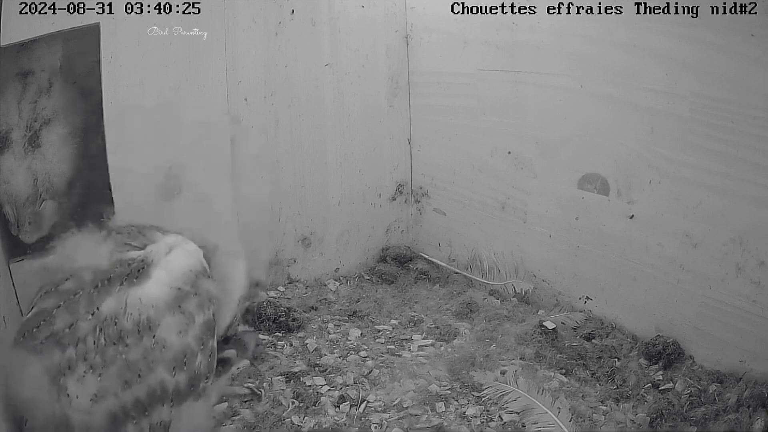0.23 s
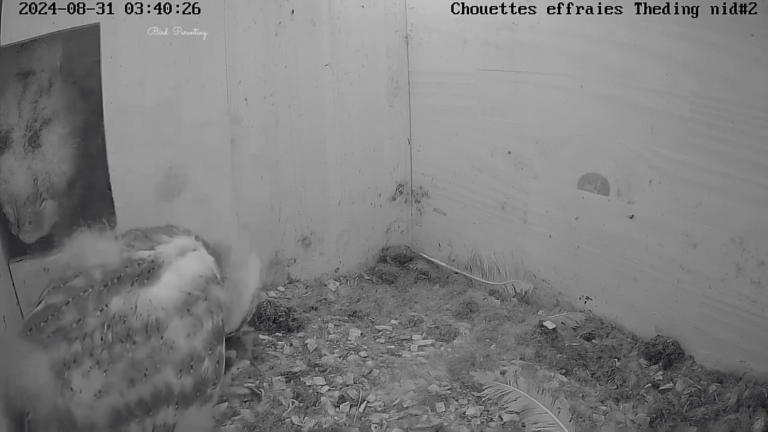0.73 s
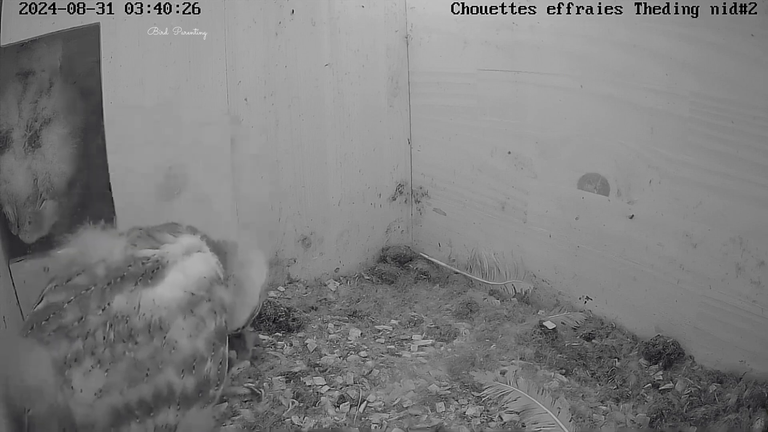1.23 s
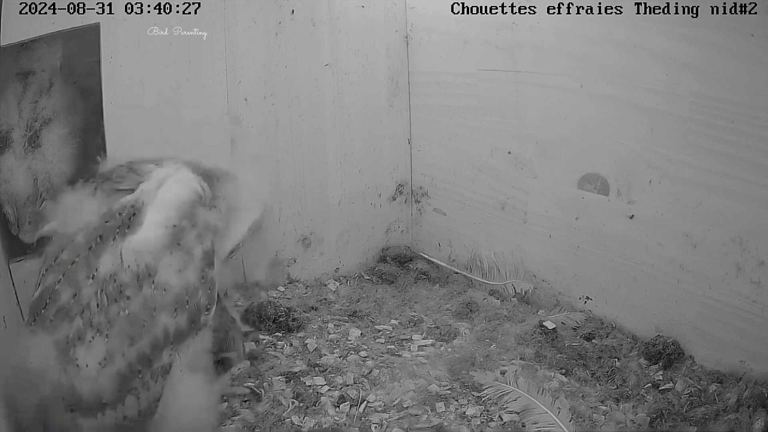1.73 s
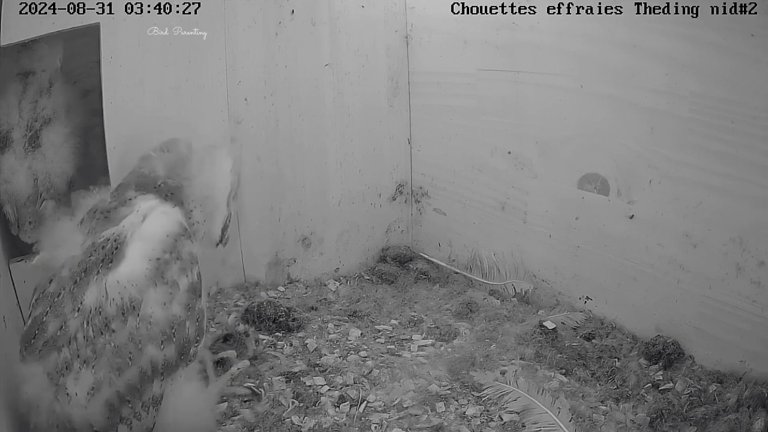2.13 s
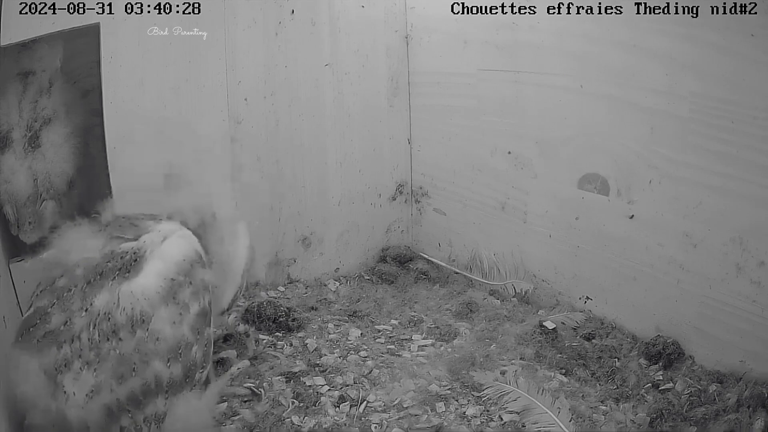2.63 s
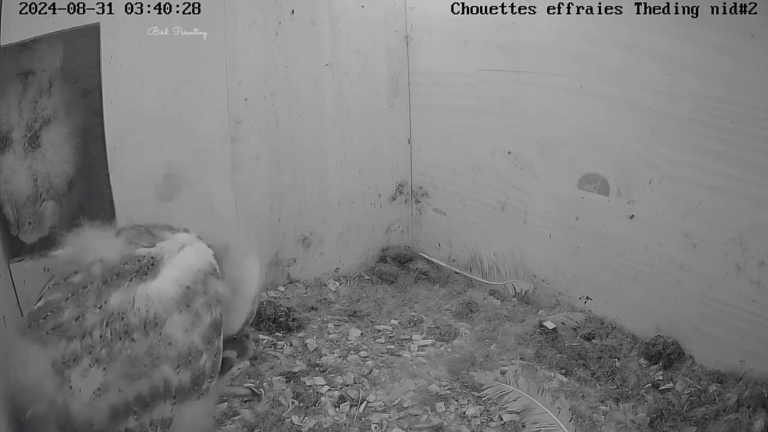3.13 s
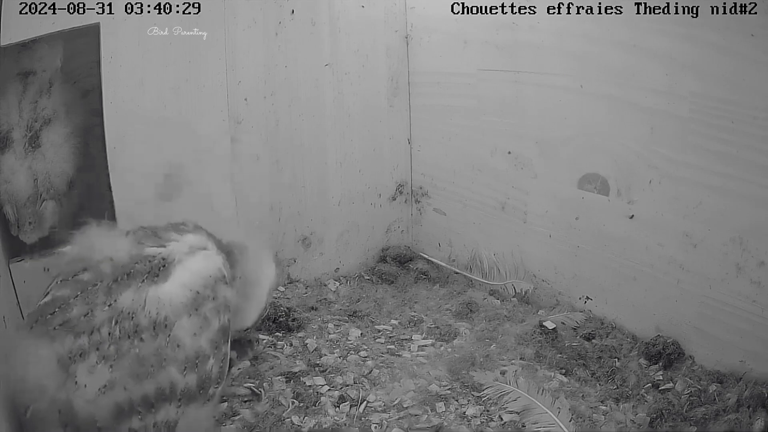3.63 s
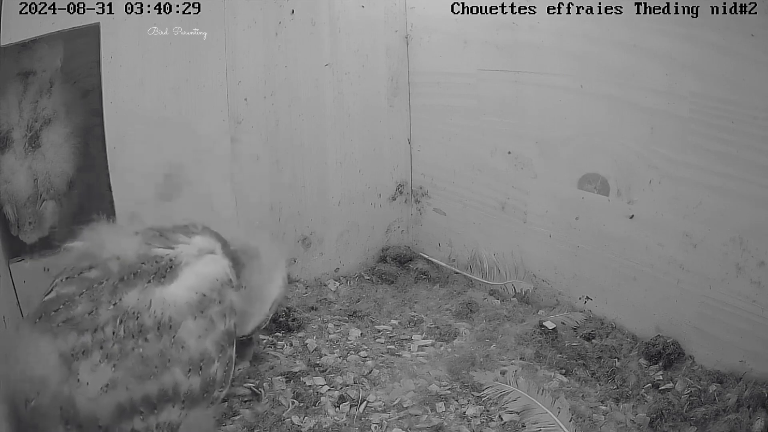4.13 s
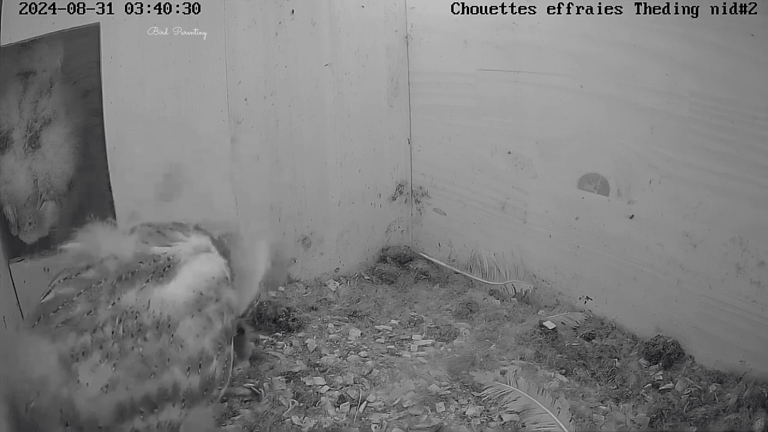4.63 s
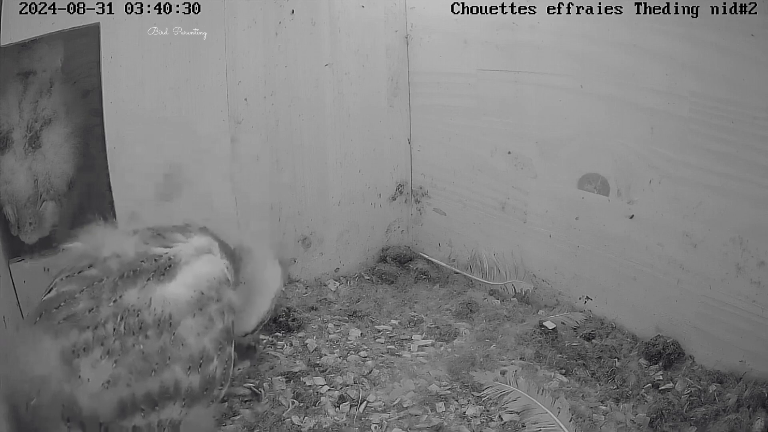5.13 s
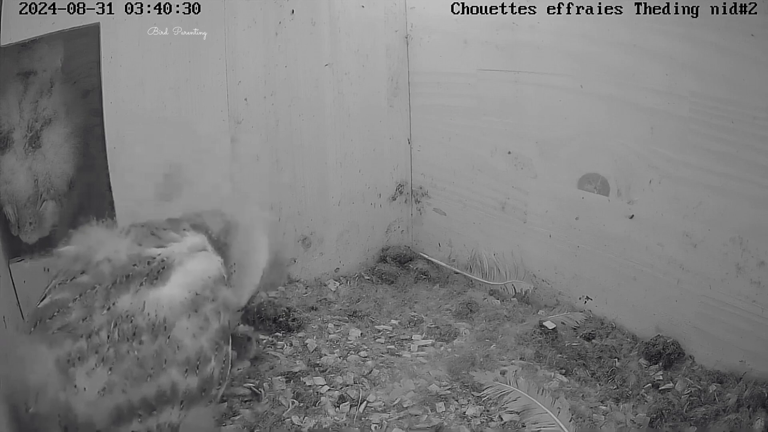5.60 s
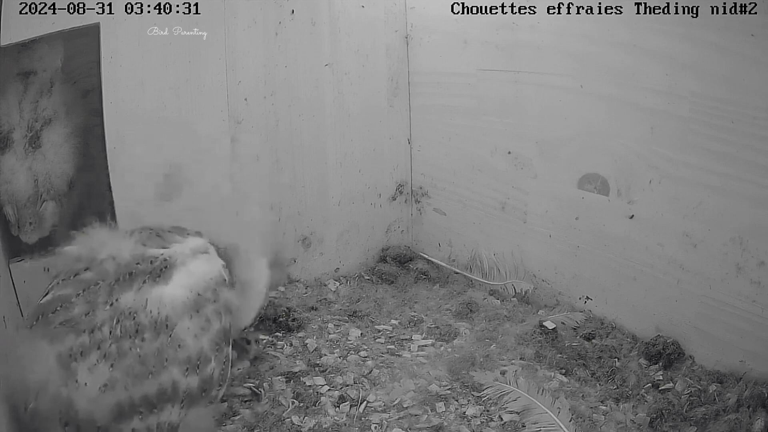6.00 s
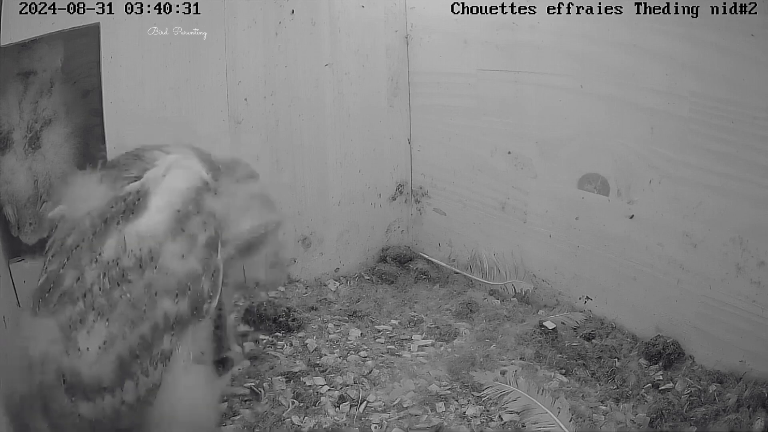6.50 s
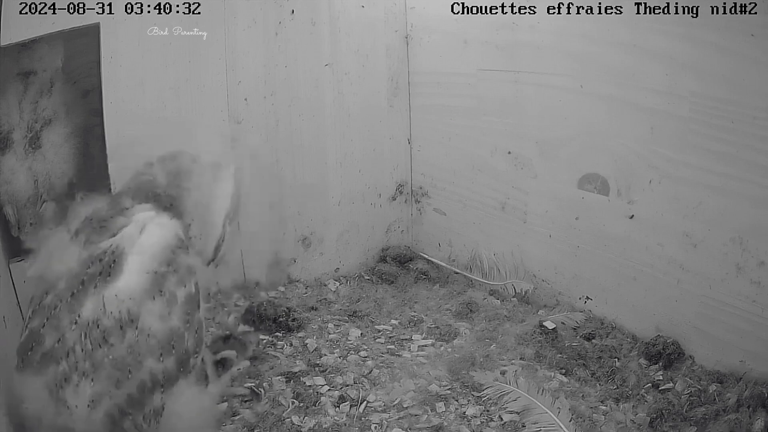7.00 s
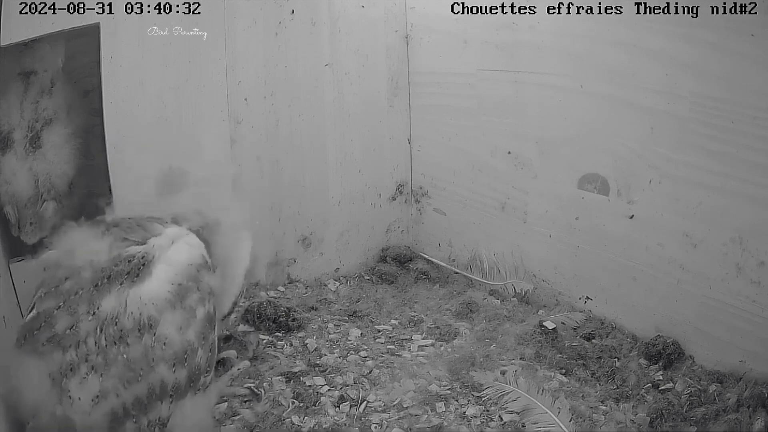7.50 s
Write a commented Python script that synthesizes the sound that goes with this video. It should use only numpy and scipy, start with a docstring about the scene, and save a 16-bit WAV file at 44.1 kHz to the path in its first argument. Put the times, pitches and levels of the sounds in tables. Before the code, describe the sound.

A barn owl chick begs close by inside a wooden nest box, with seven rasping, breathy hisses that each swell and fade over about half a second or a little longer. The first is already ending at the start; the others begin at about 0.6, 1.5, 2.2, 3.4, 4.8 and 6.9 seconds. Several finish with a tiny falling whistle, clearest at 0.2, 1.2 and 4 seconds. The chick's feet make low, dull thumps on the boards at 0.3 and 0.8 seconds, then a stronger cluster from 1.7 to 2.2, each leaving a short rumble. Around 6.4 seconds come more thumps and a brief scratch of claws on wood and dry litter. A soft, steady microphone hiss runs underneath, with small sharp clicks near 2.1, 2.4, 7.1 and 7.5 seconds. The whole sound cuts out for an instant about eleven times a second, giving a slight stutter.

```python
"""In a wooden nest box, a barn owl chick begs with seven long, rasping hisses.
Each is rushing air ringing in its throat, its bill and the box; some end on a brief whistle.
As it shifts about, its feet thump the floor and its claws scratch the litter.
The nest camera adds a steady hiss and a few clicks, and its sound cuts out for an instant
about eleven times a second."""
import sys
import numpy as np
from scipy import signal
from scipy.fft import rfft, irfft
from scipy.io import wavfile

SR = 44100
rng = np.random.default_rng(int(sys.argv[2]) if len(sys.argv) > 2 else 0)


def master_out(mix):
    """Clip the mix to full scale and print it as 16-bit PCM to the path in sys.argv[1]."""
    frames = np.transpose(np.atleast_2d(mix))
    ceiling = np.clip(frames, -1, 1)
    pcm = np.round(ceiling * 32767).astype(np.int16)
    wavfile.write(sys.argv[1], SR, pcm)


N = 341775
TIME = np.arange(N) / SR
HZ = np.fft.rfftfreq(N, 1 / SR)


def begging(turn_at_s=5.21, turn_length_s=0.033):
    """Seven hisses, each coloured by how the chick holds its head; it turns during the sixth."""
    # The hisses: (start [s], length [s], swell time [s], later growth [dB/s], fade time [s],
    # fade curve [1 = even, more = late and steep], level [dB], low band against that level [dB],
    # high band against that level [dB], opening puff [dB])
    hisses = [(-.3, 0.51, .28, 0, 0.24, 3.6, -32, -7.5, -10, 0),
              (0.63, 0.58, 0.21, 5.5, 0.21, 3, -38, -4, -0.9, -4),
              (1.493, .512, 0.48, 10, 0.17, 1.7, -42.5, -5, -3.5, 5),
              (2.243, .716, 0.48, 4.5, 0.13, 2.4, -39.5, -7.5, -8.5, 7),
              (3.433, 0.5915, 0.27, 14.5, 0.16, 2.74, -35.5, -11.5, -5, 14),
              (4.767, 0.767, .45, -1.5, .085, 2.6, -42, -1, -6, 5),
              (6.891, 0.65, .34, 13, .075, 0.99, -35, -12.5, -4.5, 15.5)]
    # Where throat, bill and box ring together, for each head pose: (pitch [Hz], width [Hz], level [dB])
    pose_1 = [(378, 140, -14.5), (574, 140, -11.5), (846, 150, -15.5), (990, 79, -6), (1063, 72, 0.5),
              (1286, 160, -3.5), (1670, 370, -12), (2040, 140, -5), (2244, 90, -0.5), (2260, 98, -2),
              (2454, 350, -4), (2710, 130, -2), (2970, 210, 0.5), (3330, 310, -3), (3430, 100, -3),
              (3830, 120, 0), (3880, 140, -9), (4130, 160, 2.5), (4200, 390, -8), (4570, 220, -4),
              (4845, 120, -15), (5070, 240, -11.9), (5390, 260, -11), (6020, 550, -13.5), (6500, 470, -18),
              (6829, 110, -9.5), (7140, 260, -15), (7300, 140, -25)]
    pose_2 = [(395, 99, -3.5), (592, 76, -5.5), (755, 76, -9), (934, 110, -7), (1080, 126, 0.7),
              (1330, 170, -2.5), (1590, 120, -10), (1686, 280, -11), (1928, 110, -12), (2000, 67, -5.5),
              (2170, 190, -10), (2350, 90, -5), (2486, 71, 2), (2670, 190, -6), (2880, 120, -2),
              (2990, 110, -5), (3144, 140, -5), (3650, 430, -4.5), (4170, 340, -3.5), (4470, 130, -2.5),
              (4920, 78, -2), (4850, 110, -9), (5070, 130, -7), (5360, 620, -9), (5800, 260, -9.9),
              (6411, 410, -5), (6630, 320, -4), (6960, 230, -3.5)]
    pose_3 = [(386, 49, 2), (470, 100, -5), (595, 110, -8), (910, 180, -4.5), (1087, 150, -2),
              (1374, 105, -5), (1730, 170, -15), (2100, 310, -4.5), (2340, 250, -7), (2484, 96, -0.5),
              (2840, 160, -4.5), (3150, 250, -6.5), (3310, 110, -4.5), (3480, 240, -7), (3770, 160, -7),
              (3980, 110, -14), (4130, 160, -7), (4460, 230, -6), (4540, 100, -15), (4850, 130, -11),
              (5140, 390, -16), (5300, 90, -8), (5500, 130, -9), (5800, 350, -9), (6070, 630, -11),
              (6670, 450, -15), (6840, 140, -16), (7170, 300, -7.5)]
    pose_4 = [(390, 58, -7), (469, 100, -9.5), (587, 88, -5.5), (894, 120, -11), (1080, 100, -11.5),
              (1210, 99, -8), (1322, 66, -1), (1408, 166, -6), (1690, 160, -20.6), (1970, 140, -22),
              (2080, 190, -16), (2320, 190, -4.5), (2500, 100, -5.5), (2673, 89, -1), (2820, 210, -4),
              (2990, 99, -3), (3200, 240, -2), (3580, 220, -2), (3900, 120, 1.8), (4100, 99, -8),
              (4400, 140, -12), (4640, 60, -2), (5100, 810, -13), (5750, 1400, -13.5), (6540, 93, -10.5),
              (6950, 400, -21), (7250, 300, -20), (7330, 120, -11)]
    pose_5 = [(380, 53, -7.5), (440, 91, -10.3), (589, 71, -11.5), (750, 82, -17.5), (870, 96, -17),
              (1059, 77, -8), (1140, 110, -18), (1290, 150, -12), (1420, 180, -18), (2146, 140, -8.5),
              (2445, 89, -4), (2480, 670, -10.8), (2730, 90, -8), (2800, 100, -8), (2990, 160, -2),
              (3210, 210, -4), (3430, 220, -8), (3690, 130, -8), (4090, 116, 2.5), (4380, 350, -6),
              (4770, 120, -8.5), (5120, 320, -8), (5760, 230, -7), (6190, 87, -7.5), (6460, 150, -18),
              (6640, 160, -8), (7000, 450, -9.5), (7420, 170, -16)]
    pose_6 = [(393, 58, -0.7), (482, 100, -3.5), (599, 60, -5), (923, 160, -7.5), (1056, 75, -1.8),
              (1140, 91, -8), (1310, 250, -8.5), (1360, 107, 0.5), (1680, 230, -12.5), (1905, 130, -9),
              (2060, 120, -6), (2240, 290, -7.5), (2450, 500, -6.5), (2660, 130, -2), (2970, 220, -6.5),
              (3240, 280, -4), (3670, 240, -6), (3880, 180, -5), (4120, 190, -9), (4520, 280, -10),
              (4861, 330, -18), (5408, 720, -16), (5876, 520, -18), (6188, 110, -9), (6230, 200, -17),
              (6560, 95, -8), (6697, 140, -20), (7000, 690, -14)]
    pose_6_turned = [(401, 68, -7), (564, 140, -7), (890, 140, -13), (1200, 200, -14), (1320, 80, -3),
                     (1360, 110, -9), (1430, 150, -12.6), (1710, 130, -25), (2059, 450, -21),
                     (2288, 170, -7), (2480, 150, -9), (2670, 89, -2.9), (2910, 150, -0.5), (3190, 340, -2),
                     (3560, 210, -1.5), (3700, 77, -5), (3900, 190, -3), (4430, 240, -11.2),
                     (4720, 130, -7.5), (5100, 710, -8.5), (5361, 250, -9), (5698, 100, -10),
                     (5880, 220, -6.5), (6188, 160, -15), (6400, 130, -5.5), (6663, 160, -20),
                     (7000, 160, -12.5), (7240, 440, -16)]
    pose_7 = [(407, 105, -4), (577, 113, -9), (750, 58, -11.5), (872, 55, -7), (1166, 290, -11.5),
              (1503, 130, -12.5), (2050, 60, -4.5), (2167, 93, -4.5), (2530, 520, -4.5), (2830, 180, -2),
              (2980, 100, 1), (3110, 85, 4.5), (3200, 91, -1), (3440, 210, -2), (3880, 300, -5.5),
              (4110, 104, 4.5), (4300, 160, -7), (4520, 370, -9.5), (4800, 240, -9), (5180, 390, -8.5),
              (5750, 130, -11), (5760, 140, -9), (6180, 120, -12.0), (6380, 180, -12.5), (6700, 170, -7),
              (7030, 130, -12), (7110, 140, -8.5), (7340, 150, -13)]
    poses = [pose_1, pose_2, pose_3, pose_4, pose_5, pose_6, pose_7]
    calls = [hiss(row, pose) for row, pose in zip(hisses, poses)]
    turned_call = hiss(hisses[5], pose_6_turned, low_change_db=-7)
    turn = np.clip((TIME - turn_at_s) / turn_length_s + .5, 0, 1)
    calls[5] = np.sqrt(1 - turn) * calls[5] + np.sqrt(turn) * turned_call
    return rasp() * sum(calls)


def hiss(row, pose, low_change_db=0, low_hz=1880, high_hz=4700, open_s=0.0076, close_s=0.019):
    """Rushing air swells and fades with the chick's effort; its low, throaty band changes least."""
    start, length, swell_s, growth, fade_s, curve, level_db, low_db, high_db, puff_db = row
    sounding = (TIME >= start) & (TIME <= start + length)
    t = TIME[sounding] - start
    time_left = length - t
    swell_db = -20 * np.clip(1 - t / swell_s, 0, 1) ** 3.07
    swell_db -= growth * np.maximum(time_left - fade_s, 0)
    fade_db = -29.5 * np.clip(1 - time_left / fade_s, 0, 1) ** curve
    # The low band puffs at the start and bulges just before the air stops.
    opening_db = puff_db * np.exp(-t / .018)
    closing_db = 1.5 * np.exp(-((time_left - 0.029) / 0.019) ** 2)
    throaty_db = low_db + low_change_db + 0.31 * swell_db + .13 * fade_db + opening_db + closing_db
    flow = np.clip(t / open_s, 0, 1) * np.clip(time_left / close_s, 0, 1)
    air = rfft(rng.standard_normal(N)) * resonances(pose) * wall_echoes()
    bands = HZ < low_hz, (HZ >= low_hz) & (HZ < high_hz), HZ >= high_hz
    low, middle, high = (unit(irfft(air * band, N)[sounding]) for band in bands)
    upper = amp(swell_db + fade_db) * (middle + amp(high_db) * high)
    out = np.zeros(N)
    out[sounding] = amp(level_db) * flow * (amp(throaty_db) * low + upper)
    return out


def rasp(depth_db=0.98, fastest_hz=170):
    """The air stream flutters unevenly, which shakes the loudness."""
    flutter = noise(1 / (1 + (HZ / fastest_hz) ** 4))
    return unit(amp(-depth_db * flutter))


def wall_echoes(echo_db=-9.0, ring_s=0.12):
    """Quick echoes between the wooden walls boost some frequencies and weaken others."""
    t = np.arange(SR // 8) / SR
    echoes = rng.standard_normal(len(t)) * amp(-60 * t / ring_s)
    return abs(1 + amp(echo_db) * rfft(echoes / np.linalg.norm(echoes), N))


def falling_notes(octave_db=-19, waver=0.033):
    """Brief falling notes: the chick's whistles, and one short low ring of the box at 3.56 s."""
    # The notes, mostly as a hiss ends:
    # (start [s], length [s], first pitch [Hz], last pitch [Hz], level [dB])
    notes = [(0.142, 0.043, 1384, 1240, -43), (0.158, 0.058, 1080, 975, -33.5),
             (1.15, .036, 1406, 1190, -44), (1.17, 0.051, 1114, 1050, -38), (1.949, 0.059, 461, 308, -42),
             (1.971, 0.048, 1250, 1080, -50), (3.564, 0.022, 380, 353, -37),
             (3.996, 0.021, 1110, 1020, -38.5), (7.518, 0.023, 1130, 1010, -48)]
    out, wobble = np.zeros(N), noise(HZ < 120)
    for start, length, first_hz, last_hz, db in notes:
        progress = np.linspace(0, 1, int(length * SR))
        hz = first_hz + (last_hz - first_hz) * progress
        hz *= 1 + waver * wobble[int(start * SR):][:len(hz)]
        phase = 2 * np.pi * np.cumsum(hz) / SR
        swell = np.sin(np.pi * progress ** 0.82) ** 2
        add(out, start, amp(db) * swell * (np.sin(phase) + amp(octave_db) * np.sin(2 * phase)))
    return out


def footsteps(rumble_db=-20, rumble_s=1.0, knock_s=0.23):
    """Each step knocks the boards and swells the floor's low note; the box rumbles on after it."""
    # Feet landing: (time [s], note level [dB], note pitch [Hz], rise time [s], knock level [dB])
    steps = [(0.269, -32, 73, 0.033, -46), (0.386, -44.5, 76, 0.019, -54.5), (.46, -46.5, 75, 0.017, -69),
             (0.75, -33, 74, 0.02, -57), (1.645, -40, 65, 0.015, -56), (1.691, -34, 77, 0.0069, -58),
             (1.985, -28, 75, 0.029, -40), (2.065, -28, 73.3, 0.023, -47.5), (2.163, -41.5, 69, 0.012, -61),
             (2.231, -38.5, 72, 0.014, -54), (4.62, -54.5, 65, 0.028, -75), (6.365, -48, 69, 0.019, -63),
             (6.423, -35, 81.4, 0.013, -49), (6.455, -32.5, 86, 0.018, -50.5),
             (6.506, -38, 75.5, 0.033, -59), (6.657, -49, 64.5, 0.038, -64)]
    # Where the box rumbles and where its boards ring: (pitch [Hz], width [Hz], level [dB])
    box_tones = [(35, 30, -8), (60, 30, 1), (86, 51, 4.5), (135, 140, -16)]
    board_tones = [(172, 39, 5.5), (276, 90, -8), (373, 56, -0.5), (750, 550, -18)]
    t = np.arange(SR) / SR
    note, rumble_power, knock_power = np.zeros((3, N))
    for start, db, hz, rise_s, knock_db in steps:
        push = (t / rise_s * np.exp(1 - t / rise_s)) ** 3
        add(note, start, amp(db) * push * np.sin(2 * np.pi * hz * t))
        shake = amp(db - 60 * t / rumble_s) * (1 - np.exp(-t / rise_s))
        add(rumble_power, start, shake ** 2)
        add(knock_power, start, amp(knock_db - 60 * t / knock_s) ** 2)
    rumble = amp(rumble_db) * np.sqrt(rumble_power) * noise(resonances(box_tones))
    knocks = np.sqrt(knock_power) * noise(resonances(board_tones))
    return note + rumble + knocks


def claw_scrapes():
    """A claw rubs briefly over dull wood and bright, dry litter."""
    # The rubs: (start [s], length [s], level [dB], brightness [0-1])
    scrapes = [(0.264, 0.011, -64, 0.4), (5.791, 0.01, -57.5, 0), (6.312, 0.013, -54, 0.65),
               (6.385, 0.031, -56, 0.8), (6.411, 0.018, -38.5, 0.27), (6.425, 0.028, -53, 0.63),
               (6.453, 0.015, -46.5, 0.26), (6.466, 0.0091, -56, 0.3)]
    # Where scratched wood and litter ring: (pitch [Hz], width [Hz], level [dB])
    wood_tones = [(390, 290, -11), (744, 55, 8.5), (1034, 190, -1.5), (1450, 260, -8), (1670, 280, -9),
                  (2200, 400, -22)]
    litter_tones = [(2800, 1800, -2), (4060, 300, -2), (5100, 840, -0.5), (6730, 1100, 0)]
    wood, litter = noise(resonances(wood_tones)), noise(resonances(litter_tones))
    out = np.zeros(N)
    for start, length, db, brightness in scrapes:
        blend = np.sqrt(1 - brightness ** 2) * wood + brightness * litter
        rub = blend[int(start * SR):][:int(length * SR)]
        add(out, start, amp(db) * unit(rub) * signal.windows.tukey(len(rub), .4))
    return out


def cut_outs(beat_s=.086276, late_s=.04641, early_s=.025864, gap_s=.0079, gap_db=-22, edge_s=.000025):
    """The camera's volume drops for an instant, over and over, on a limping beat."""
    beat = np.arange(1, N / SR / beat_s)
    stalls = beat // 4  # every fourth beat comes late
    slips = np.floor(.432 + .25 * beat + .218 * stalls)  # about every third comes early
    times = -.04656 + beat_s * beat + late_s * stalls - early_s * slips
    volume = np.ones(N)
    for middle in times:
        volume[round((middle - gap_s / 2) * SR):round((middle + gap_s / 2) * SR)] = amp(gap_db)
    lag = np.exp(-1 / (edge_s * SR))  # barely softens the edges
    return signal.lfilter([1 - lag], [1, -lag], volume)


def camera_clicks():
    """Each click is a sudden jump in the signal that dies away."""
    # Sharp clicks in the camera's sound: (time [s], level [dB], fall time [s])
    clicks = [(0.2685, -45, .0005), (2.0713, -33.5, .002), (2.437, -36, .0001), (7.113, -35, .0001),
              (7.479, -25, 0.000065)]
    out, t = np.zeros(N), np.arange(SR // 20) / SR
    for start, db, fall_s in clicks:
        add(out, start, amp(db) * np.exp(-t / fall_s))
    return out


def microphone_hiss(level_db=-59.5):
    """The camera's microphone makes a steady noise of its own."""
    # The colour of that noise: (frequency [Hz], relative level [dB])
    colour = [(15, -28), (40, 1.5), (72, 0), (130, -4), (250, -6), (500, -8.5), (1000, -13), (2000, -17.5),
              (4000, -20.5), (6000, -23), (6700, -26.5), (7600, -36.5)]
    hz, db = np.transpose(colour)
    return amp(level_db) * noise(amp(np.interp(np.log(HZ + 1), np.log(hz), db)))


def amp(db):
    """Turns decibels into a gain, the number to multiply a sound by."""
    return 10 ** (np.asarray(db) / 20)


def unit(x):
    """Scales a sound to an average strength (rms) of 1."""
    return x / np.sqrt(np.mean(x ** 2) + 1e-20)


def noise(gain):
    """Noise of strength 1, shaped by a gain for each frequency."""
    return unit(irfft(rfft(rng.standard_normal(N)) * gain, N))


def resonances(tones):
    """A gain for each frequency, with a steep peak at every ringing tone."""
    powers = (amp(db) ** 2 / (1 + (2 * (HZ - hz) / width) ** 2) ** 2 for hz, width, db in tones)
    return np.sqrt(sum(powers))


def add(mix, start_s, sound):
    """Mixes a sound in at the given time."""
    part = mix[max(round(start_s * SR), 0):][:len(sound)]
    part += sound[:len(part)]


def lowpass(x, edge_hz):
    """Removes the treble above edge_hz without delaying the sound."""
    taps = signal.firwin(401, edge_hz, window=("kaiser", 7), fs=SR)
    return signal.oaconvolve(x, taps[None], "same")


def scene():
    """The chick and its box over the microphone hiss, in one channel."""
    return (begging() + falling_notes() + footsteps() + claw_scrapes() + microphone_hiss())[None]


def record(dry):
    """The camera loses the top treble, clicks and cuts out; the sudden gaps crackle faintly."""
    chopped = lowpass(dry, edge_hz=7600) * cut_outs()
    return lowpass(chopped + camera_clicks(), edge_hz=15800)


dry = scene()
out = record(dry)
master_out(out)
```